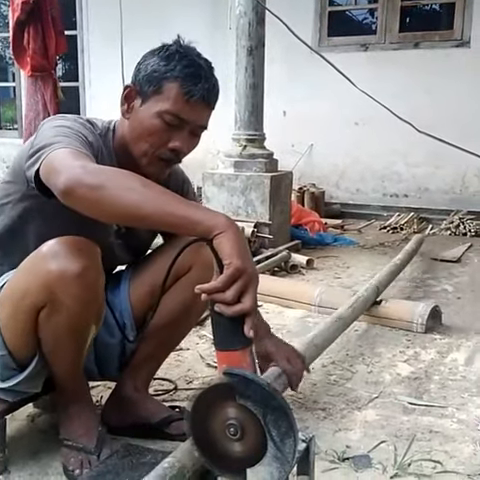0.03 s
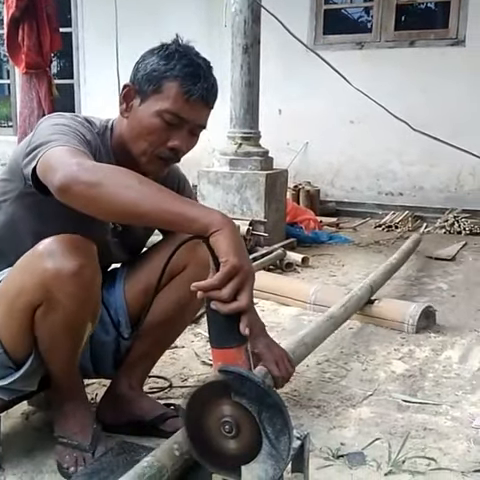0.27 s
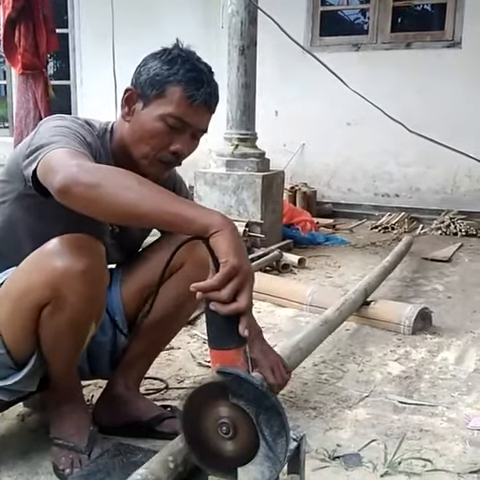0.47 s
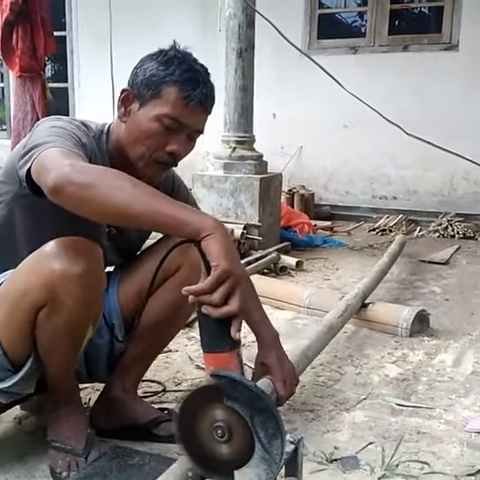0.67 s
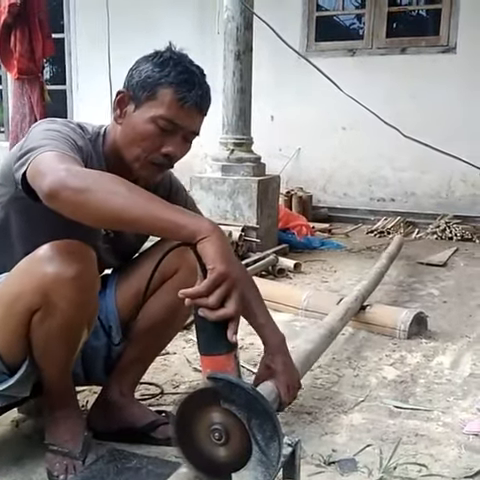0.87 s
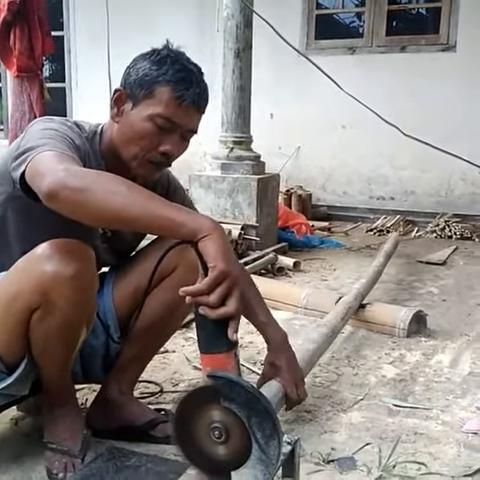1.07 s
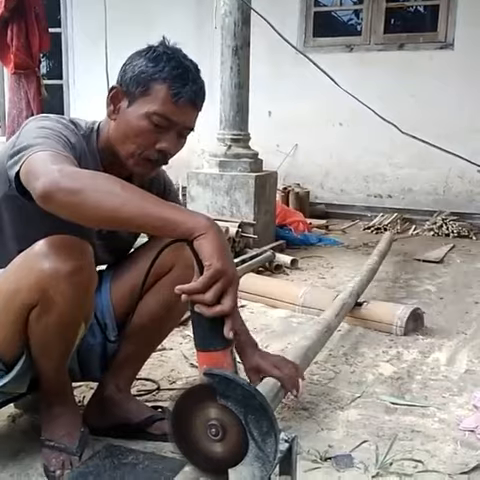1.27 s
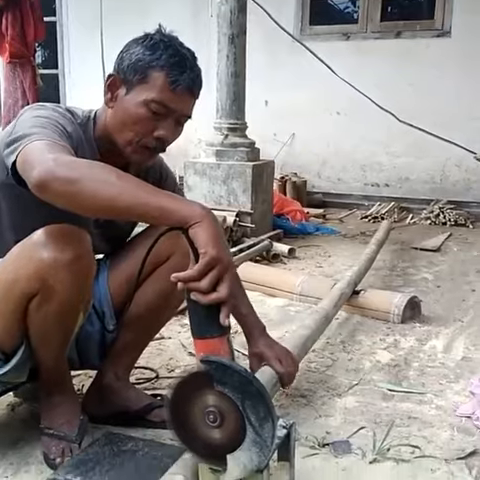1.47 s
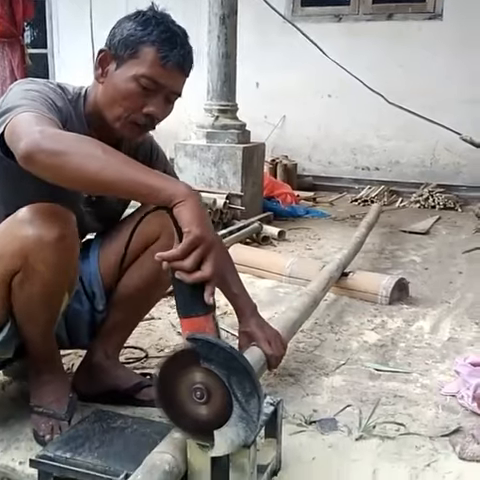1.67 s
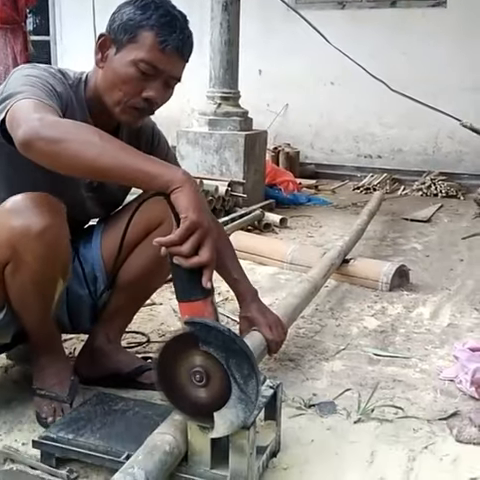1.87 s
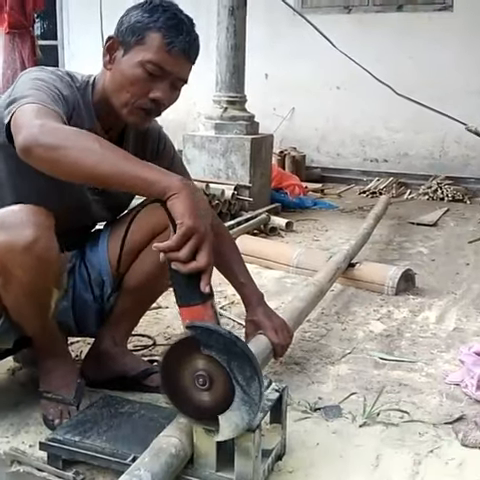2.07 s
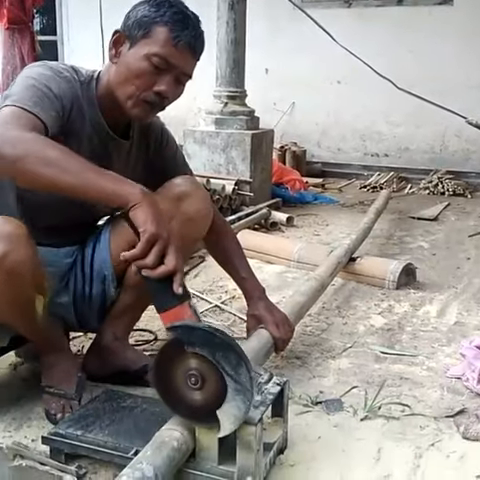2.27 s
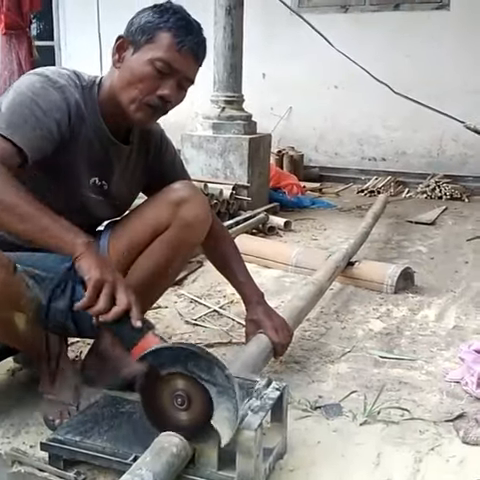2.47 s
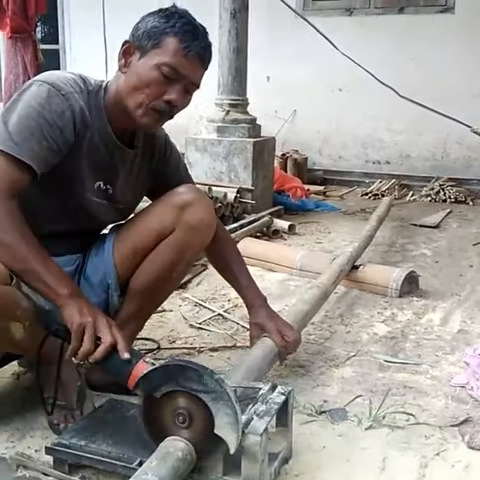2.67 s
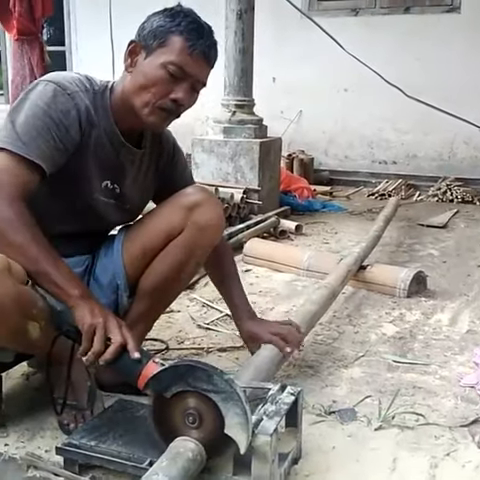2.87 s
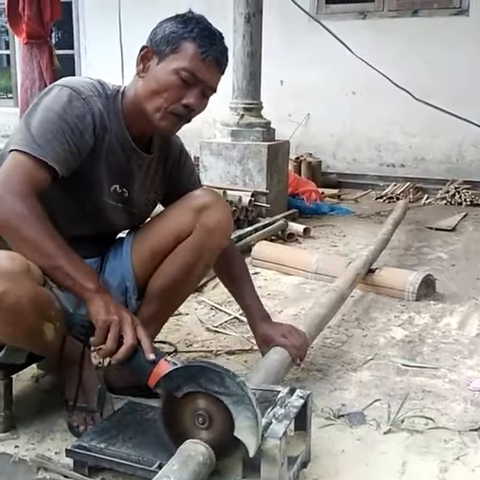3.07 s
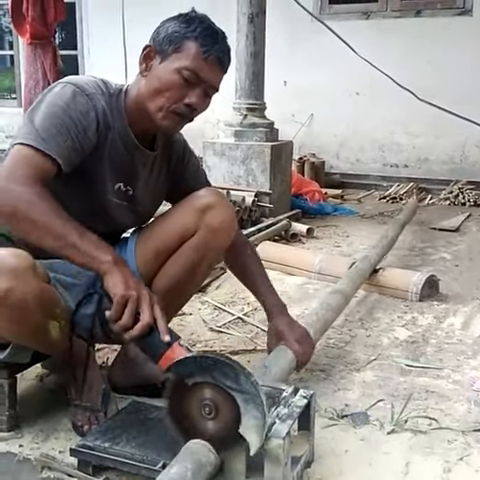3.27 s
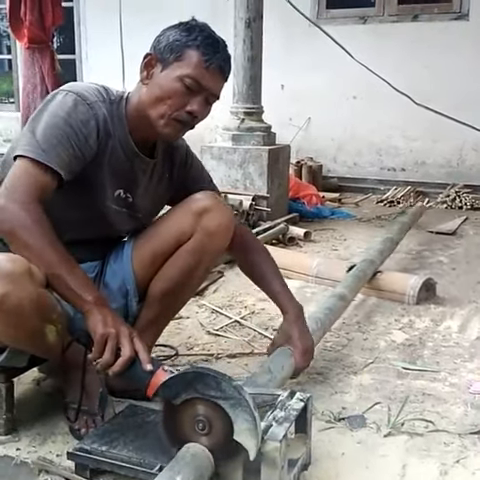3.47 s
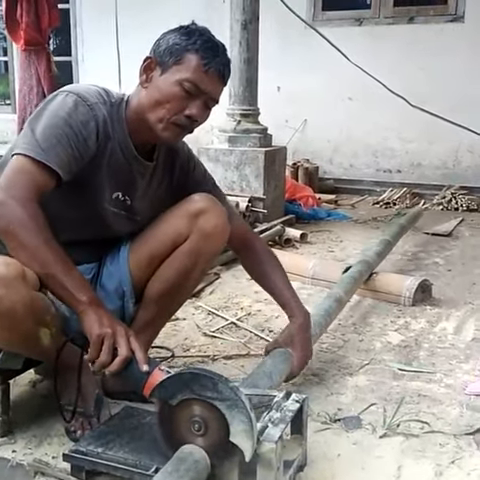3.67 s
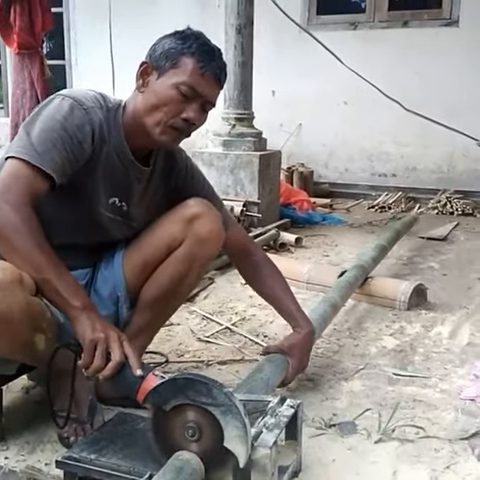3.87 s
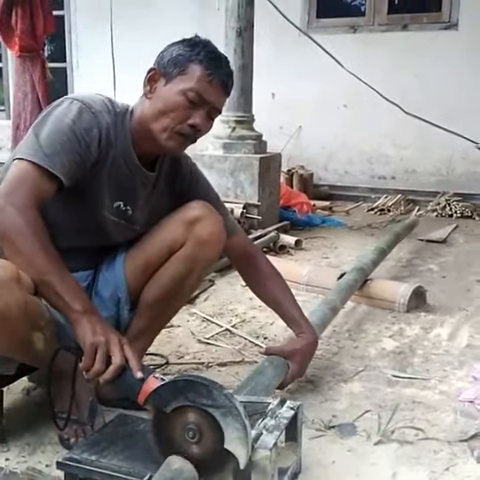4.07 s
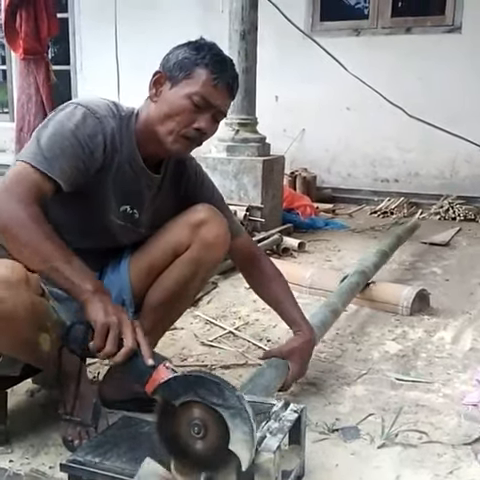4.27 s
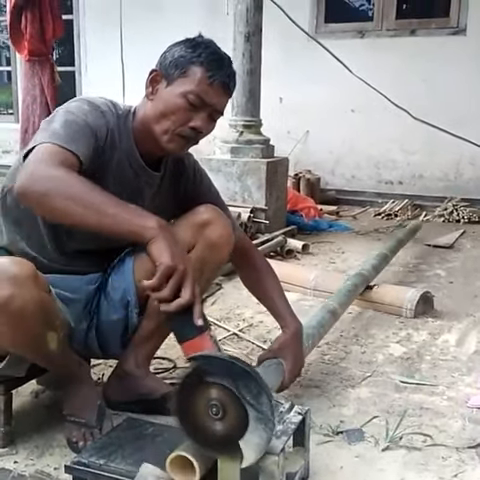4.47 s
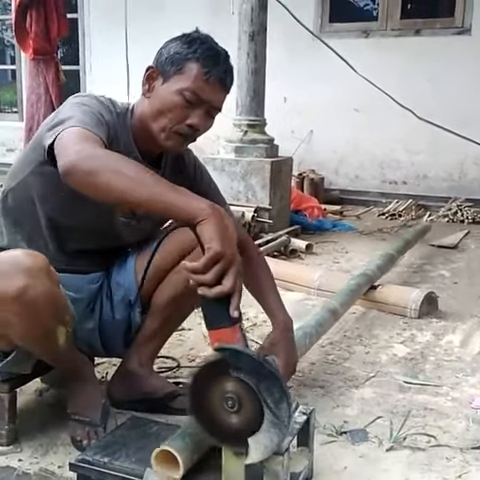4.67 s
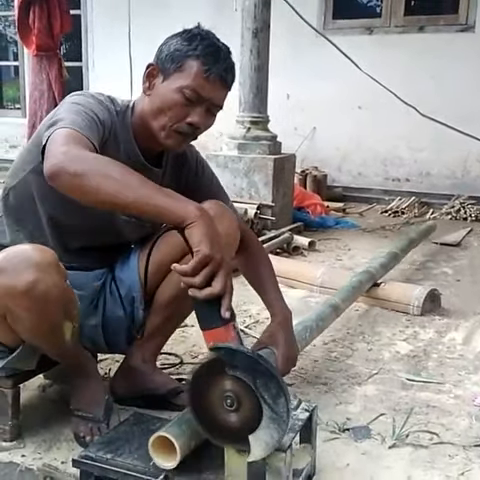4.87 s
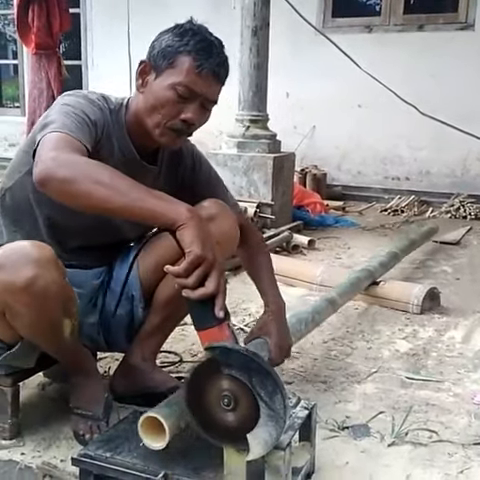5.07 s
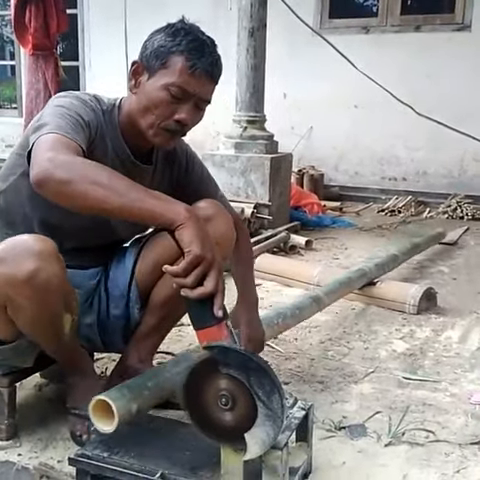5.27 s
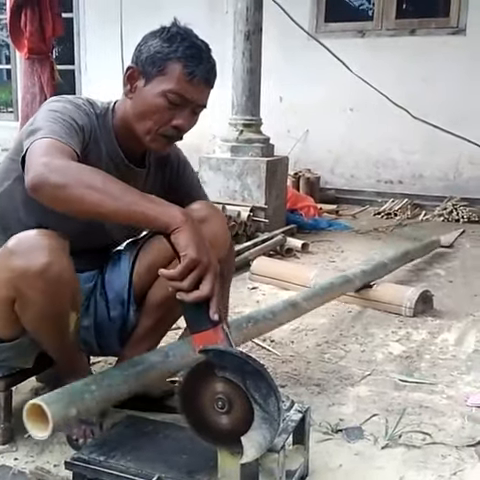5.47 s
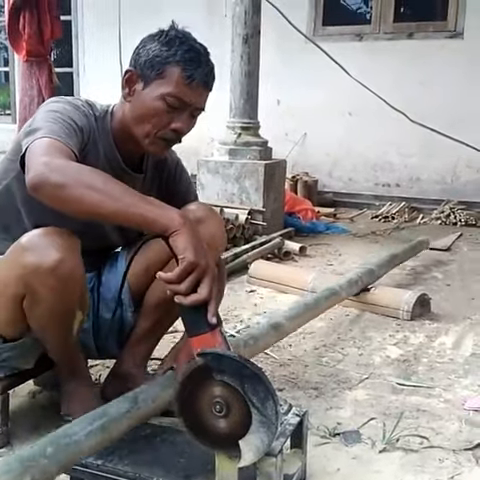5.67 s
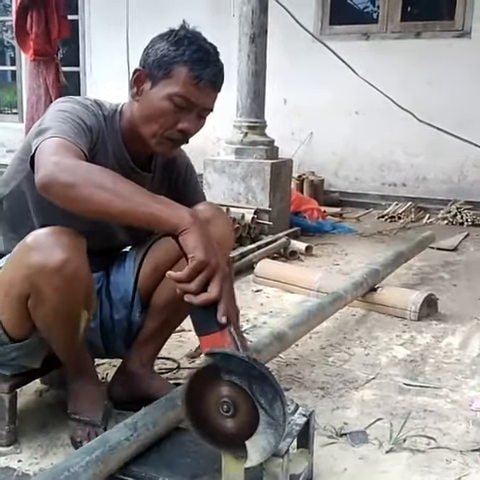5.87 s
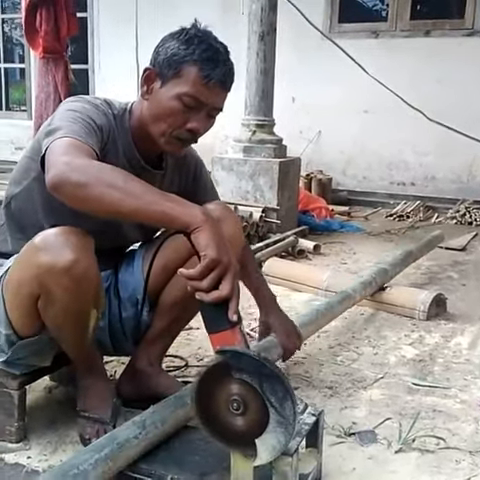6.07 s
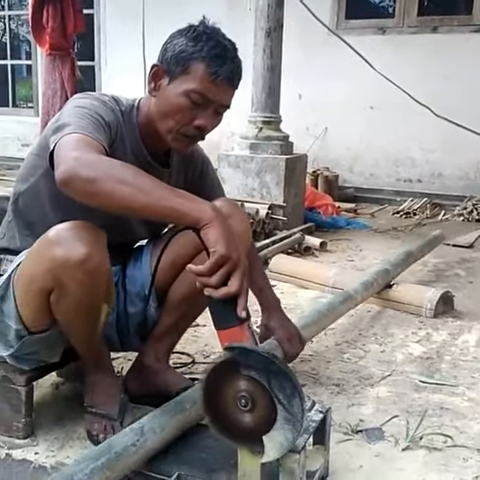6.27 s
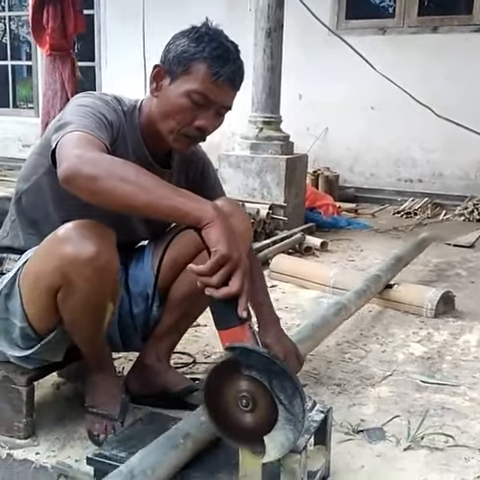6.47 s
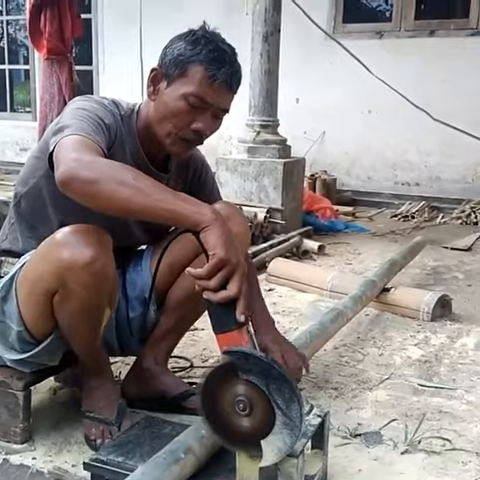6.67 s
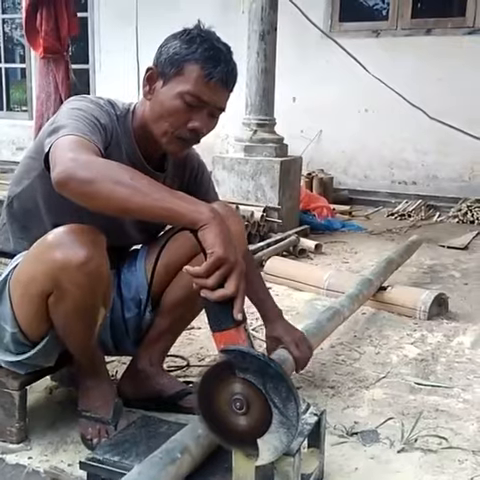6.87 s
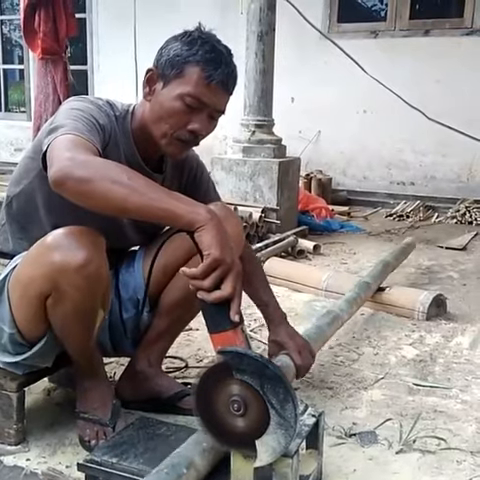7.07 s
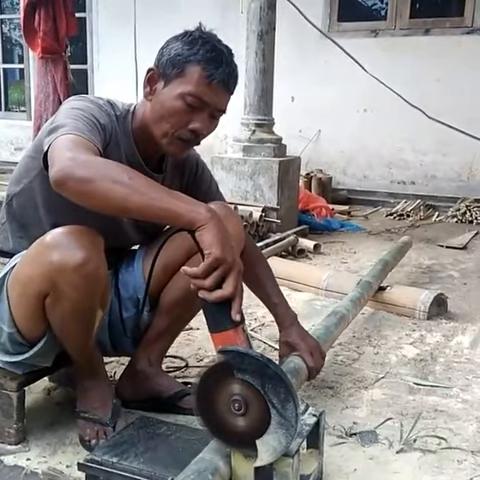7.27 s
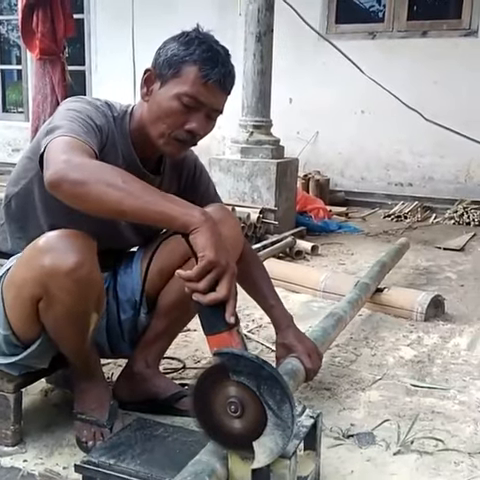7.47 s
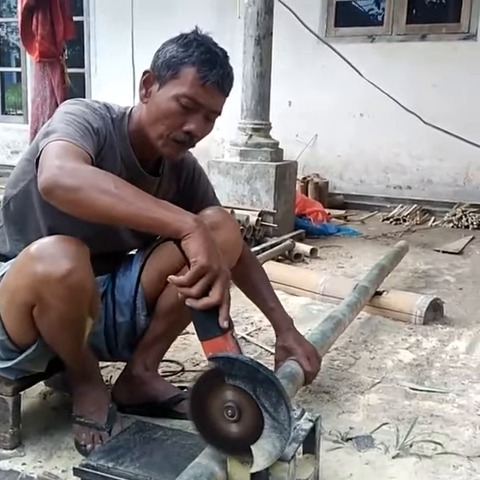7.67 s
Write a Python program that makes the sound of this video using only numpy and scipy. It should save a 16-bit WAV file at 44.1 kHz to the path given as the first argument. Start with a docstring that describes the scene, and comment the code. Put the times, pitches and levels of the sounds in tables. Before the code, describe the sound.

Close by outdoors, an angle grinder runs free with a high whine, airy hiss and light rattle. Its saw blade bites into a bamboo pole for about two seconds, a loud tearing rasp with metallic ringing that drags the motor down and slightly distorts. Afterwards the quieter whine slowly climbs back in pitch while the hollow pole knocks several times as it is shifted.

```python
"""Angle grinder through bamboo

A grinder with a toothed saw blade runs free, bogs down in a bamboo pole and slowly regains its speed.
The teeth tear the fibres and set the blade ringing; cooling air hisses, fan and teeth whine.
The hollow pole knocks as it is shifted. A phone held close by overloads during the cut."""
import sys
import numpy as np
from scipy import signal
from scipy.fft import rfft, irfft, next_fast_len
from scipy.io import wavfile
from scipy.ndimage import uniform_filter1d, map_coordinates

SR = 44100
rng = np.random.default_rng(int(sys.argv[2]) if len(sys.argv) > 2 else 0)


def wrap_up_sound(samples):
    """Save the sound to the file named by the first command line argument, as 16-bit audio."""
    columns = np.atleast_2d(samples).T
    # keep every value between -1 and 1, then stretch to whole-number steps
    tamed = np.clip(columns, -1, 1)
    steps = np.round(tamed * 32767).astype(np.int16)
    wavfile.write(sys.argv[1], SR, steps)


N = 340893
FIRM_BITE_DB, FIRM_JUDDER_DB = -22, -44  # a firm cut: the reference for tearing and ringing
FREE_TURNS = 461  # unloaded motor speed, turns/s

# Envelopes of the cut: t/s, bite level/dB, pole judder level/dB
CUT_ENVELOPE = [(2.57, -29, -63), (2.61, -22.5, -39), (2.76, -23, -39.5), (2.81, -20.5, -42.5),
                (3.02, -22.5, -47), (3.11, -21.5, -37), (3.22, -25, -58), (3.3, -24, -49),
                (3.37, -21.5, -37), (3.5, -22, -37), (3.68, -22, -48.5), (3.98, -23, -51),
                (4.03, -23.5, -36), (4.12, -25, -59), (4.19, -23, -35.5), (4.3, -24.5, -52),
                (4.34, -31, -73), (4.41, -30, -70), (4.48, -22, -45.5), (4.56, -29, -64), (4.66, -41, -65),
                (4.85, -58, -74)]
# Bright rasp of the bite: f/Hz, relative level/dB
BITE_EQ = [(530, -23), (900, -19), (1240, -19), (1580, -11.5), (1740, -14.5), (2130, -12.5), (3220, -17),
           (4080, -10), (4760, -10.5), (6150, 1.5), (6680, -1.5), (8200, -3), (10500, -22.5), (13600, -69),
           (22000, -120)]
# Top-end sizzle of tearing fibres, also heard in the air: f/Hz, relative level/dB
FIZZ_EQ = [(5000, -32.5), (8500, 4), (9420, -5.5), (12300, -3), (13700, -5), (14300, -3)]
# Low growl of the shaking pole: f/Hz, relative level/dB
JUDDER_EQ = [(15, -37), (25, 0.5), (128, 5), (229, 0.5), (294, 3), (1160, -2), (1300, -2), (1690, -12),
             (2860, -120)]
# Fine blade modes, the metallic sheen: f/Hz, bandwidth/Hz, relative level/dB
RIM_MODES = [(4884, 12, -11), (5015, 30, -13), (5290, 24, -12), (5428, 18, -7), (5512, 16, -5),
             (5685, 18, -8), (5800, 20, -8), (6100, 18, -5), (6238, 18, -4), (6485, 18, -5), (6750, 24, -7),
             (7340, 26, -1), (7500, 28, -5), (7955, 24, -2), (8568, 26, -6), (9865, 30, -19),
             (11000, 70, -24), (11900, 50, -26)]

def cut():
    """Teeth tear the fibres: noise that rings the blade and shakes the pole. Returns mid and side."""
    span = slice(round(CUT_ENVELOPE[0][0] * SR), round(CUT_ENVELOPE[-1][0] * SR))
    bite_db, judder_db = [curve[span] for curve in envelopes(CUT_ENVELOPE)]
    tear_db = -29.5 + 1.06 * (bite_db - FIRM_BITE_DB) + 0.31 * (judder_db - FIRM_JUDDER_DB)
    n = len(bite_db)
    chatter_db = 0.5 * wobble(40)[span]
    bite = amp(bite_db + chatter_db) * noise_pair(eq(BITE_EQ), patchy_db=1.9, size=n)
    rim = amp(bite_db - 1.5) * noise_pair(modes(RIM_MODES), patchy_db=4.1, size=n)
    tear = amp(tear_db + 2.4 * chatter_db) * noise_pair(eq(FIZZ_EQ), patchy_db=3.3, size=n)
    judder_gain = amp(judder_db + 0.98 * wobble(24.9)[span])
    judder = judder_gain * noise_pair(eq(JUDDER_EQ), patchy_db=1.7, size=n)
    mid, side = bite + rim + tear + judder
    out = np.zeros((2, N))
    out[0, span] = mid + blade_ring(bite_db, span)
    out[1, span] = amp(-2.5) * side
    return out


# Large-area blade modes, in groups A-F that ring together: f/Hz, bandwidth/Hz, relative level/dB
BLADE_MODES = [
    [(1602, 14, 0)],
    [(2085, 30, -11), (2251, 12, -2), (2497, 9, 2)],
    [(3530, 14, -13), (3985, 12, 0), (4540, 20, -9)],
    [(6010, 14, 0)],
    [(6354, 22, 0)],
    [(7089, 14, 0)],
]
# Sustained ring of each group: level at a firm bite/dB, change as the cut deepens/(dB/s)
BLADE_SUSTAIN = [(-41, -1.5), (-49.5, 5), (-45, 2.5), (-41, 6), (-35.5, 3), (-33, -1)]
# Accents where one group sings out: t/s, group, peak level/dB, length/s
BLADE_ACCENTS = [(2.63, "E", -24, 0.13), (2.72, "E", -28, .08), (2.77, "F", -28, .08),
                 (2.835, "A", -31.5, 0.077), (3.03, "C", -41.5, 0.25), (3.126, "A", -34, 0.16),
                 (3.106, "D", -29, .15), (3.29, "A", -39, 0.076), (3.26, "B", -41, 0.12),
                 (3.345, "D", -20, 0.093), (3.38, "E", -26, 0.058), (3.385, "A", -35, 0.084),
                 (3.5, "F", -26, 0.13), (3.52, "D", -24.5, 0.33), (3.65, "B", -44, 0.13),
                 (3.88, "B", -45, .25), (3.962, "A", -35, 0.074), (4.042, "D", -20.5, .08),
                 (4.195, "D", -22.5, 0.11), (4.192, "A", -38, 0.058), (4.264, "F", -19, 0.097),
                 (4.344, "C", -32.5, 0.16), (4.346, "B", -33.5, 0.15), (4.556, "B", -45, .12)]

def blade_ring(bite_db, span):
    """Each group of blade modes rings along with the bite and now and then sings out."""
    t = np.arange(N)[span] / SR
    drive_db = 0.77 * (bite_db - FIRM_BITE_DB)
    ring = 0
    for name, group_modes, (db, db_per_s) in zip("ABCDEF", BLADE_MODES, BLADE_SUSTAIN):
        sustain_db = db + db_per_s * (t - t[0]) + drive_db + 2.5 * wobble(13)[span]
        accents = sum(amp(peak_db) * np.exp(-(2 * (t - at) / length) ** 2)
                      for at, group, peak_db, length in BLADE_ACCENTS if group == name)
        metal = unit_rms(filtered(rng.standard_normal(len(t)), modes(group_modes)))
        ring += (amp(sustain_db) + accents) * metal
    return ring


def motor_speed():
    """Turns/s of the motor: it creeps towards free speed, is dragged down in the wood and recovers."""
    start_turns, loaded_turns = 449.4, 356
    entry_s, through_s, drag_s, regain_s = 2.583, 4.27, 0.19, 1.3
    t = np.arange(N) / SR

    def regain(turns, elapsed):
        return FREE_TURNS - (FREE_TURNS - turns) * np.exp(-elapsed / regain_s)

    drop = regain(start_turns, entry_s) - loaded_turns
    dragged = loaded_turns + drop * np.exp(-np.abs(t - entry_s) / drag_s)
    recovering = regain(loaded_turns, t - through_s)
    return np.select([t < entry_s, t < through_s], [regain(start_turns, t), dragged], recovering)


# Envelopes of the running machine: t/s, cooling air level/dB, housing rattle level/dB
AIR_ENVELOPE = [(0, -23, -46.5), (.61, -22.5, -49), (1.02, -27.5, -50.5), (1.62, -24, -49),
                (1.77, -26, -51), (2.15, -25, -49.5), (2.56, -25, -48.5), (4.66, -35, -54),
                (4.8, -32.5, -54), (4.98, -36, -54), (5.1, -31.5, -55.5), (5.17, -34.5, -55.5),
                (5.7, -33.5, -54), (5.79, -31, -53), (6.27, -30, -53.5), (6.78, -28, -54),
                (7.34, -30, -51.5), (7.42, -27.5, -48.5), (7.73, -28.5, -50.5)]
# Bright vent hiss at full speed: f/Hz, relative level/dB
FAST_AIR_EQ = [(2530, -45), (4300, -34), (4760, -54), (5090, -47.5), (5220, -23), (5300, -14.5), (6180, -1),
               (6830, -2), (7420, 1), (7850, 0.5), (9420, -14), (10500, -17.5), (13600, -36.5),
               (22000, -120)]
# Duller vent hiss at low speed: f/Hz, relative level/dB
SLOW_AIR_EQ = [(2530, -70), (4300, -38), (4810, -16), (5130, -5.5), (5800, -7), (6780, 4.5), (7200, 2),
               (7700, -5.5), (10500, -31), (13600, -70), (22000, -120)]
# Broad rattle of the housing: f/Hz, relative level/dB
HOUSING_EQ = [(15, -49), (25, -14), (261, -16.5), (446, -12), (583, -22.5), (713, -9), (1490, -11),
              (1700, -8), (1950, -8), (2850, -9.5), (3110, -14.5), (3400, -13.5), (3890, -9.5),
              (4550, -7.5), (5200, -3), (6760, -49), (11400, -120)]
# Blade and guard stirred by the motor: f/Hz, bandwidth/Hz, relative level/dB
IDLE_MODES = [(407, 30, -3), (1385, 14, 1.5), (1621, 28, 1.5), (1748, 45, 2)]

def air_and_rattle():
    """Cooling air gusts through the vents, brighter at speed; the housing rattles. Mid and side."""
    turns = motor_speed()
    air_db, rattle_db = envelopes(AIR_ENVELOPE)
    crossfade = np.clip((turns - 395) / 55, 0, 1)
    gust_db, surge_db = 1.05 * wobble(60), 1.3 * wobble(14)
    fast_air = np.sqrt(crossfade) * noise_pair(eq(FAST_AIR_EQ), patchy_db=1.0)
    slow_air = np.sqrt(1 - crossfade) * noise_pair(eq(SLOW_AIR_EQ), patchy_db=3.0)
    hiss = amp(air_db + gust_db + surge_db) * (fast_air + slow_air)
    fizz_db = air_db - 11 - 0.12 * (FREE_TURNS - turns) + 0.6 * gust_db + 2.1 * wobble(16)
    housing = noise_pair(eq(HOUSING_EQ), patchy_db=1.5)
    ring_db = -7.5 - 0.57 * np.arange(N) / SR  # tucked under the rattle, slowly fading
    ring = amp(ring_db) * noise_pair(modes(IDLE_MODES), patchy_db=3.0)
    fizz = amp(fizz_db) * noise_pair(eq(FIZZ_EQ), patchy_db=1.6)
    rattle = amp(rattle_db + 1.3 * wobble(16)) * (housing + ring)
    return hiss + fizz + rattle


# Swells of the whine: t/s, fan level/dB, teeth level/dB, armature hum level/dB
WHINE_ENVELOPE = [(0, -48, -78, -72), (.42, -37.5, -57, -69), (.84, -51, -63, -72), (1.2, -42, -61.5, -72),
                  (1.54, -47, -48.5, -70), (1.7, -55, -55, -71), (1.96, -53, -59, -75),
                  (2.24, -39.5, -56.5, -76), (2.42, -49.5, -51.5, -68), (2.56, -31, -49.5, -64),
                  (2.585, -36, -36, -64), (2.61, -57, -54, -70), (4.6, -63, -68, -74),
                  (5.0, -60, -72, -69.5), (5.22, -47.5, -63, -64.5), (5.55, -51, -56.5, -65.5),
                  (5.75, -38.5, -60.5, -62.5), (6, -44, -65, -61.5), (6.25, -40, -54.5, -61),
                  (6.58, -42, -69, -74), (6.85, -42.5, -61.5, -63.5), (7.12, -57, -68, -61.5),
                  (7.54, -39.5, -55.5, -63), (7.73, -44, -48.5, -64)]
# Scream of the teeth in the wood, an octave above their whine: t/s, level/dB
SCREAM_ENVELOPE = [(2.585, -60), (2.62, -27), (2.72, -26), (2.8, -31), (2.88, -46), (4.22, -46),
                   (4.32, -33), (4.55, -27), (4.66, -48)]

def whine():
    """Fan vanes, saw teeth and armature each sing at a pitch tied to the motor speed."""
    vane_count, tooth_count, gear_ratio = 12, 24, 13 / 37
    turns = motor_speed()
    fan_hz, tooth_hz = turns * vane_count, turns * gear_ratio * tooth_count
    fan_db, tooth_db, hum_db = envelopes(WHINE_ENVELOPE)
    scream_db, = envelopes(SCREAM_ENVELOPE, left=-120, right=-120)
    octave_db = -56 - 0.5 * (FREE_TURNS - turns) + 3 * wobble(4.95)  # dies away as the motor slows
    fan = tone(fan_hz, fan_db, jitter_rad=0.39, flutter_db=3.1)
    fan_octave = tone(2 * fan_hz, octave_db, jitter_rad=0.9, flutter_db=5)
    teeth = tone(tooth_hz, tooth_db, jitter_rad=0.36, flutter_db=2.8)
    scream = tone(2 * tooth_hz, scream_db, jitter_rad=0.6, flutter_db=3.2)
    hum = tone(turns, hum_db, jitter_rad=1.02, flutter_db=4.5)
    return fan + fan_octave + teeth + scream + hum


# Hits on the pole: t/s, drive level/dB, thud f/Hz, relative wall send/dB, 60 dB decay time/s
POLE_HITS = [(0.028, -40, 902, -10, 0.24), (1.299, -51.5, 262, -1, 0.16), (4.769, -38.5, 152, -11, 0.18),
             (4.847, -48.5, 160, -1, 0.17), (5.123, -40.5, 139, -16, 0.13), (5.249, -50, 434, -5, 0.35),
             (5.311, -37, 744, -23, 0.083), (5.419, -50.5, 151, -4, 0.34), (5.991, -38.5, 496, -2.5, 0.26),
             (6.01, -28, 832, 2, 0.053), (6.045, -42, 344, 1.5, 0.15), (6.083, -36.5, 441, -17, 0.11),
             (6.119, -52, 580, 1, 0.39), (6.719, -49.5, 339, 1, 0.087), (7.499, -51, 370, -17, 0.22)]
# Hollow body of the pole: f/Hz, bandwidth/Hz, gain/dB
BODY_MODES = [(215, 73, 5.5), (333, 41, 7.5), (533, 230, 0.5), (860, 200, 0.5), (1050, 240, -2.5)]
# Narrow, woody ring of the tube wall: f/Hz, bandwidth/Hz, gain/dB
WALL_MODES = [(1404, 17, 7.5), (1630, 30, 1.5), (1780, 90, -10.5), (2050, 83, -9.5)]

def pole_knocks():
    """Each knock is a short noisy push into the hollow body and the wall of the tube."""
    attack_s, wall_boost_db = 0.0058, 17.5
    body, wall = np.zeros((2, N + SR))
    t = np.arange(SR // 4) / SR
    for at, db, thud_hz, send_db, decay_s in POLE_HITS:
        span = slice(round(at * SR), round(at * SR) + len(t))
        envelope = amp(db - 60 * t / decay_s) * (1 - np.exp(-t / attack_s))
        body_noise, wall_noise = rng.standard_normal((2, len(t)))
        thud = 0.7 * np.sin(2 * np.pi * thud_hz * t)
        body[span] += envelope * (2.87 * body_noise + thud)
        wall[span] += amp(send_db + wall_boost_db) * envelope * wall_noise
    return filtered(body[:N], modes(BODY_MODES)) + filtered(wall[:N], modes(WALL_MODES))


def tone(hz, db, jitter_rad, flutter_db):
    """A sine with phase jitter and a level that flutters around db (rms)."""
    phase = 2 * np.pi * np.cumsum(hz) / SR + jitter_rad * wobble(45)
    return np.sqrt(2) * amp(db + flutter_db * wobble(30)) * np.sin(phase)


def noise_pair(response, patchy_db, size=N):
    """Two noises of one colour, rms 1, sharing random patches of gain in time and frequency."""
    real, imag = rng.standard_normal((2, 2, 257, size // 256 + 3))
    patches = uniform_filter1d(rng.standard_normal(real.shape[1:]), 10, axis=0)
    patches = uniform_filter1d(patches, 8, axis=1)
    spectra = (real + 1j * imag) * amp(patchy_db * unit_rms(patches))
    _, pair = signal.istft(spectra, window="cosine", nperseg=512)
    return unit_rms(filtered(pair[:, :size], response))


def wobble(rate):
    """A smooth random modulator with rate knots a second."""
    steps = np.arange(0, N + 32, 32)
    knots = rng.standard_normal(int(N * rate / SR) + 4)
    return np.interp(np.arange(N), steps, map_coordinates(knots, [steps * rate / SR]))


def envelopes(rows, **ends):
    """One value per sample for each column after the time."""
    times, *columns = np.transpose(rows)
    return [np.interp(np.arange(N) / SR, times, column, **ends) for column in columns]


def eq(points):
    """The response through (f/Hz, level/dB) points on a log frequency axis."""
    f, db = np.transpose(points)
    return lambda hz: amp(np.interp(np.log(hz + 1), np.log(f + 1), db))


def modes(table):
    """The response of a bank of resonators, summed with alternating polarity."""
    return lambda f: sum((-1) ** k * amp(db) * 1j * f * width / (centre ** 2 - f ** 2 + 1j * f * width)
                         for k, (centre, width, db) in enumerate(table))


def filtered(x, response):
    """x through a frequency response, padded to leave room for ringing."""
    n = x.shape[-1]
    padded = next_fast_len(n + SR // 4)
    return irfft(rfft(x, padded) * response(np.fft.rfftfreq(padded, 1 / SR)), padded)[..., :n]


def amp(db):
    return 10 ** (np.asarray(db) / 20)


def unit_rms(x):
    return x / np.sqrt(np.mean(x ** 2) + 1e-20)


# Stereo width, opening up in the treble: f/Hz, side gain/dB
WIDTH_EQ = [(60, -28), (2500, -33), (4200, -29), (5000, -50), (6000, -29.5), (8000, -10.5), (10000, -7),
            (14000, -7.5)]

def scene():
    """Treble noise arrives from all around; tones and knocks stay in the middle."""
    mid, side = air_and_rattle() + cut()
    mid = mid + whine() + pole_knocks()
    side = filtered(side, eq(WIDTH_EQ))
    return np.array([mid + side, mid - side])


def record(dry):
    """The phone overloads; below the treble the sound stays near mono, and the very top is cut off."""
    ceiling, top_hz = 0.19, 14290
    side_eq = eq([(60, -20), (500, -30), (2000, -33), (4000, -48), (4900, 1.5)])
    left, right = dry / (1 + np.abs(dry / ceiling) ** 6) ** (1 / 6)
    mid = (left + right) / 2
    side = filtered((left - right) / 2, side_eq)
    return filtered(np.array([mid + side, mid - side]), lambda hz: hz < top_hz)


dry = scene()
out = record(dry)
wrap_up_sound(out)
```